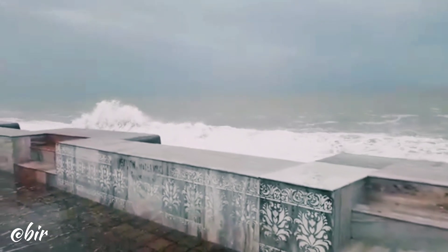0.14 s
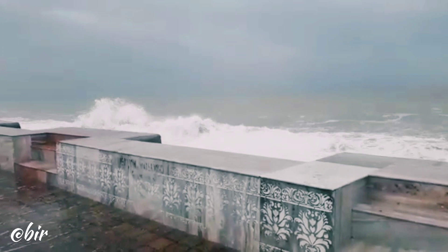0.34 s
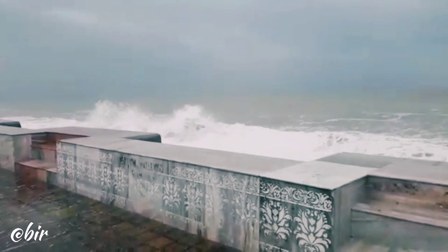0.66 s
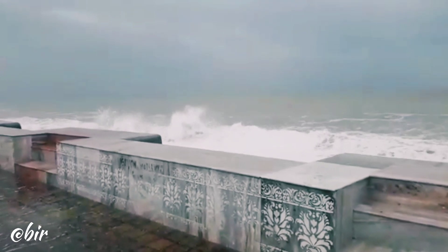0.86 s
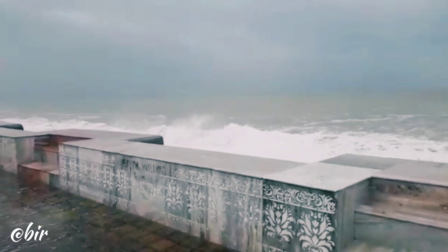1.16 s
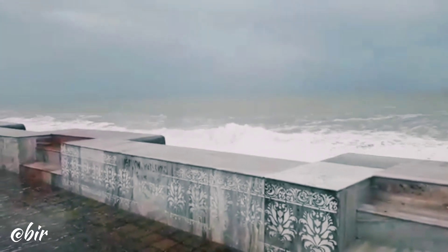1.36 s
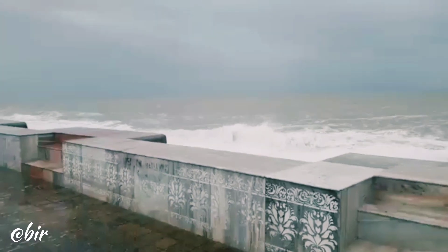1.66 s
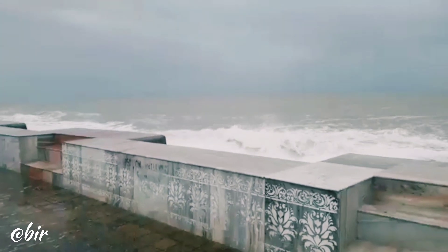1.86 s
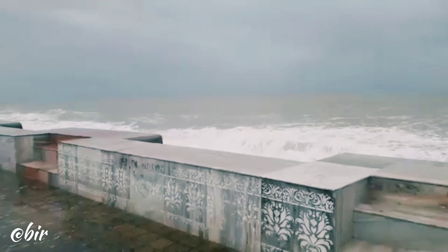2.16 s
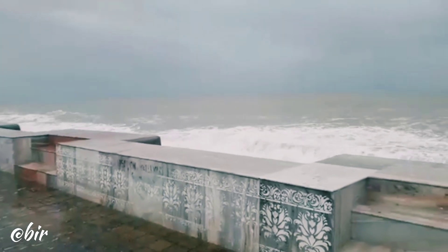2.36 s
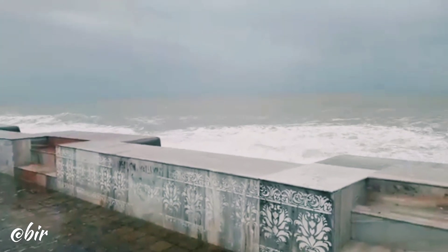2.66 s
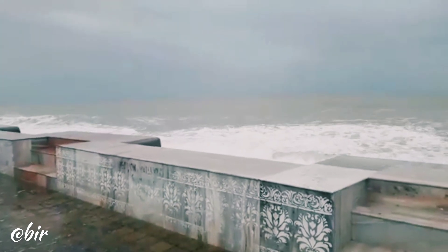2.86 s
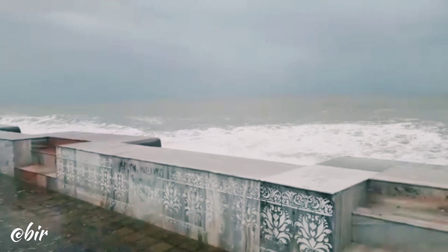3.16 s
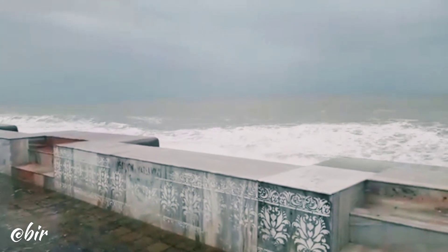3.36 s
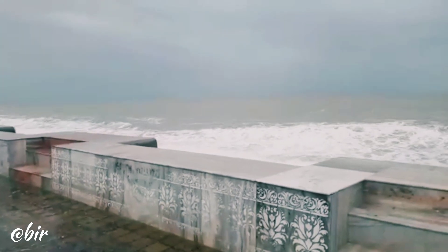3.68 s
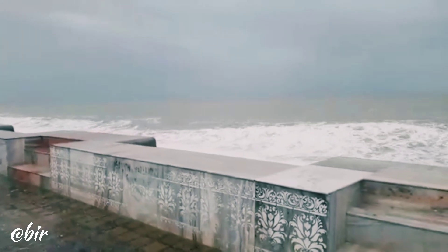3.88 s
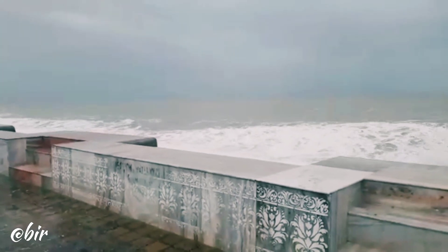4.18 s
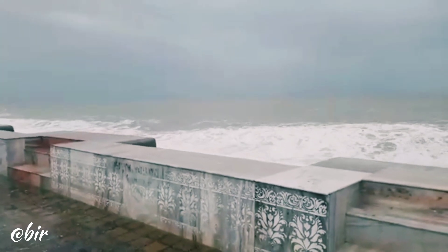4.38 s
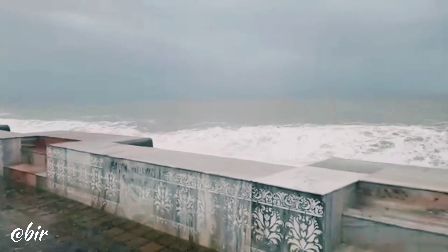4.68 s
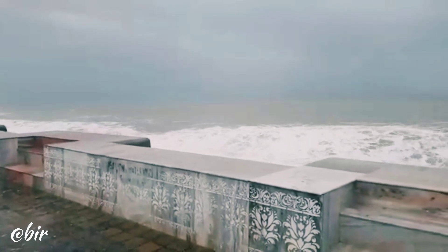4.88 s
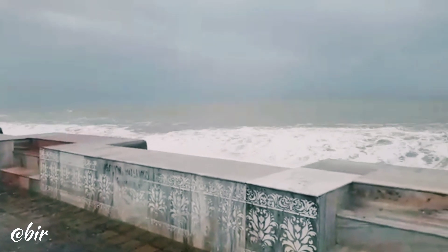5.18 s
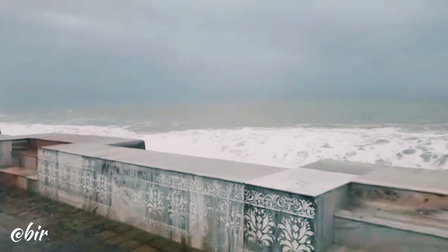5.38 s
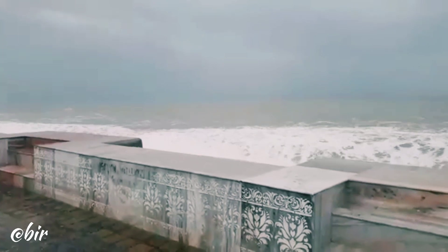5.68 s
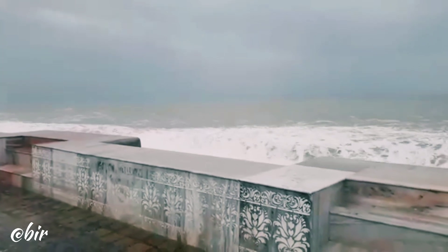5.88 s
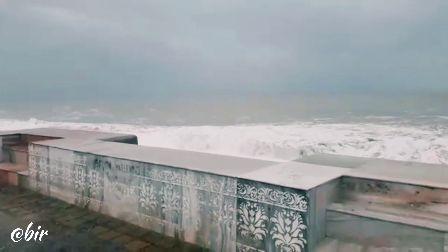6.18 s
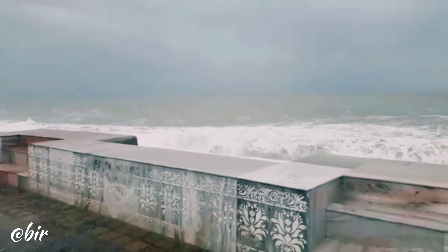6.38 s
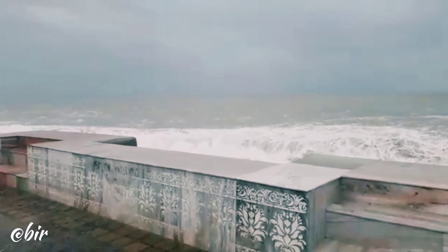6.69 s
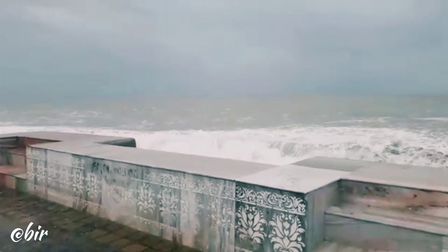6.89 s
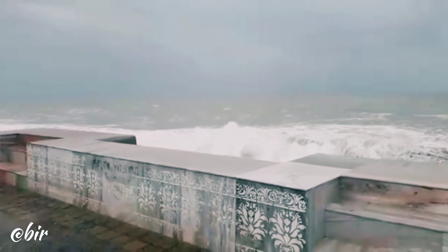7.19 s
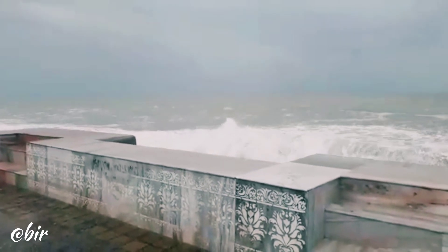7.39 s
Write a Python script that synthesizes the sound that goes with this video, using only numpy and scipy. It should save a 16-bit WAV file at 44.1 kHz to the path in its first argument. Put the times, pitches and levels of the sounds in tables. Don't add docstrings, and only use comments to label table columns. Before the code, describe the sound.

Gusty storm wind beats directly on a handheld phone microphone as short, low, muffled thumps and fluttering rumble. It starts moderate and patchy, grows into dense hard buffeting around the middle, lulls, then surges again. Far beneath, heavy surf at a seaside wall makes a steady, dull-to-foamy hiss with soft low booms. Open outdoor space, essentially mono, with slightly grainy treble.

```python
import sys
import numpy as np
from scipy import signal
from scipy.io import wavfile
from scipy.ndimage import uniform_filter1d, map_coordinates

SR = 44100
rng = np.random.default_rng(int(sys.argv[2]) if len(sys.argv) > 2 else 0)


def field_ratio(decibels):
    return 10 ** (np.asarray(decibels, dtype=float) / 20)


def persist_wave(psi):
    counts = np.round(np.clip(psi, -1, 1) * 32767).astype(np.int16)
    wavfile.write(sys.argv[1], SR, np.atleast_2d(counts).T)


N = 332514

# start_s, peak_db, pitch_hz (of the eddy), edge_db (sharp edge against the peak)
BUFFETS = [(.213, -18, 317, -15), (.335, -6.5, 213, -40), (.707, -12, 210, -18), (1.572, -7, 282, -34),
           (2.554, -8, 290, -8.5), (2.649, -7, 212, -19), (2.749, -4.5, 248, -14), (2.767, -12, 288, -18),
           (2.89, -8.5, 265, -17), (2.935, -4, 226, -15), (3.106, -8, 280, -10.5), (3.223, -2.5, 390, -25),
           (3.285, -0.5, 263, -22), (3.353, 1, 272, -11), (3.554, -6, 290, -10.5), (3.68, -5.5, 275, -31),
           (3.73, -6, 335, -22), (3.882, -6, 240, -19.5), (4.005, -10.5, 181, -29), (5.053, -6, 300, -22),
           (5.101, 2, 390, -16), (5.532, -8, 208, -19), (5.573, -8.5, 390, -18), (5.603, -5.5, 270, -32),
           (5.678, -1.5, 370, -14.5), (5.862, -8.5, 420, -8.5), (5.966, -8.5, 288, -20),
           (6.21, -9.5, 320, -18), (7.151, -6.5, 318, -29), (7.205, 0.5, 237, -35)]


def evened(x):
    return x / np.sqrt(np.mean(x ** 2) + 1e-20)


def read(points, hz, order=1):
    columns = np.transpose(points)
    return np.interp(np.log(hz + 1), np.log(columns[0] + 1), columns[order])


def lumps(per_s):
    coarse = rng.standard_normal(2000)
    return evened(map_coordinates(coarse, [np.arange(N) * per_s / SR], order=3))


def surf():
    # start_s, roar_db, bright_db (foam against the roar)
    sea = [(0, -47.5, 1.5), (.86, -47.5, 0.5), (1.2, -46, 0), (2.04, -46, -1.5), (2.55, -42.5, -3),
           (2.75, -43.5, -2), (3.3, -44, -2.5), (3.82, -46.5, -1), (4.39, -47, 0), (4.49, -44, -2.5),
           (4.6, -48, 2), (4.89, -43.5, 0), (5.08, -46.5, 0), (5.8, -47.5, 0.5), (6.1, -47.5, 1),
           (6.9, -45, -0.5), (7.25, -42.5, -0.5), (7.54, -42.5, -2)]
    # frequency_hz, density_db (per Hz)
    surf_colour = [(60, -15.5), (150, 1.5), (300, -10), (600, -16), (1000, -20.5), (1750, -25.5),
                   (2080, -23.5), (2550, -26.5), (2800, -29), (4000, -29.5), (5100, -36), (7200, -31.5),
                   (8900, -36), (13200, -44)]
    wash_share, spray_share = 0.67, 0.65
    boom_share = 1.53

    frames, hz = N // 128 + 5, np.fft.rfftfreq(512, 1 / SR)
    t = np.arange(frames) * 128 / SR
    real, imaginary, patches = rng.standard_normal((frames, 257, 3)).T
    noise = real + 1j * imaginary
    patches = uniform_filter1d(patches, size=9, axis=0)
    patches = evened(uniform_filter1d(patches, size=24, axis=1))
    flicker = evened(uniform_filter1d(rng.standard_normal(frames), size=18))

    spray = np.clip(np.log2(hz / 3600 + 1e-3) / 0.71, 0, 1)[:, None]
    wash = np.clip(np.log2(hz / 1600 + 1e-3) / 0.55, 0, 1)[:, None] * (1 - spray)
    boom = np.clip(np.log2(1200 / (hz + 1)) / 0.8, 0, 1)[:, None]

    s, roar_db, bright_db = np.transpose(sea)
    brightening_db = np.interp(t, s, bright_db - np.mean(bright_db))
    colour_db = read(surf_colour, hz)[:, None]
    field_db = colour_db + np.interp(t, s, roar_db)
    field_db = field_db + (wash_share * wash + spray_share * spray - boom_share * boom) * brightening_db
    field_db = field_db + (0.66 + 0.14 * spray) * patches
    field_db = field_db + (0.4 * wash + 0.5 * spray) * flicker

    roar_band = ((hz > 1000) & (hz < 1900))[:, None]
    plain = signal.istft(noise * field_ratio(colour_db) * roar_band, nperseg=512, noverlap=384)[1]
    water = signal.istft(noise * field_ratio(field_db), nperseg=512, noverlap=384)[1][:N]
    return water / np.std(plain)


def gusts():
    # start_s, level_db
    breeze = [(0.0, -41), (0.52, -28), (0.8, -32), (1.07, -37.5), (1.57, -31), (2.29, -33), (2.6, -25.5),
              (3.0, -26.5), (3.34, -21.5), (3.61, -22.5), (3.8, -28.5), (4.26, -38), (5.02, -22),
              (5.5, -21.5), (5.98, -26), (6.53, -29), (7.22, -22.5), (7.54, -21)]
    # centre_s, half_length_s, level_db, sharpness_db (small eddies against large)
    flurries = [(0.023, 0.15, -24, -39), (0.214, .015, -25.5, -0.5), (0.286, 0.061, -23.5, -14),
                (0.445, 0.024, -21, -6.5), (.6, 0.043, -21.5, -22), (1.437, 0.037, -19.5, -8.5),
                (1.55, .045, -20.5, -11), (1.864, 0.034, -21, -12), (2.562, .025, -17, -2.5),
                (2.762, 0.034, -11, -4.5), (2.875, 0.037, -17.5, -8), (3.01, 0.022, -26, 6.5),
                (3.108, 0.016, -9, -3), (3.184, 0.042, -12, -6), (3.288, 0.0098, -12, -0.5),
                (3.362, 0.022, -22.5, 10), (3.56, 0.023, -15, -5), (3.66, 0.033, -12.5, -7),
                (3.758, 0.018, -16.5, -3.5), (4.413, .035, -25, -4), (4.615, .025, -15, -9),
                (4.864, 0.15, -22.5, -7.5), (5.07, 0.034, -19.5, 4.5), (5.178, 0.043, -19.5, -5.5),
                (5.33, 0.023, -18, -8), (5.43, 0.056, -20, -5.5), (5.678, 0.057, -21.5, -4),
                (5.858, 0.03, -21.5, 6), (6.336, 0.018, -20, -28), (7.215, 0.069, -19, -5)]
    # centre_s, half_length_s, depth_db
    lulls = [(.92, .05, 7), (1.363, .025, 7), (2.7, .02, 6), (3.07, .025, 7), (3.61, 0.023, 11),
             (3.83, .035, 6), (3.917, .03, 7), (4.663, 0.022, 12), (5.772, 0.027, 5), (6.06, .02, 7),
             (6.151, 0.017, 6)]
    flutter_db, flutter_per_s = 5, 24
    dull_db = -13

    t = np.arange(N) / SR
    steady_db = np.interp(t, *np.transpose(breeze)) + 1.5
    steady_db = steady_db - flutter_db * np.maximum(lumps(flutter_per_s), 0)
    large = field_ratio(2 * steady_db)
    small = large * field_ratio(2 * dull_db)
    for s, half, db, sharp_db in flurries:
        bell = field_ratio(2 * db) * np.exp(-(2 * (t - s) / half) ** 2 / 2)
        large = large + bell
        small = small + bell * field_ratio(2 * sharp_db)
    lull_db = sum(db * np.exp(-((t - s) / half) ** 2) for s, half, db in lulls)
    return 10 * np.log10(large) - lull_db, 10 * np.log10(small) - lull_db


def eddies(s, size, hz, phase, cycles):
    lag = np.arange(-500, 500)
    turns = hz[:, None] * lag / SR
    bell = np.exp(-(2 * turns / cycles) ** 2)
    swing = size[:, None] * bell * np.cos(2 * np.pi * (turns + phase[:, None]))
    at = np.round(s * SR).astype(int)[:, None] + lag + 500
    return np.bincount(at.ravel(), swing.ravel(), N + SR)[500:N + 500]


def tumble(level_db, hz, spread, cycles, uneven_db, lumpy_db, count):
    when, big, pitch, phase = rng.random((count, 4)).T
    size = field_ratio(-uneven_db * np.log(1 - 0.98 * big))
    eddy_hz = hz * np.exp(spread * (2 * pitch - 1))
    stream = evened(eddies(when * N / SR, size, eddy_hz, phase, cycles))
    clumped = evened(stream * field_ratio(lumpy_db * lumps(per_s=33)))
    return field_ratio(level_db) * clumped


def wind(large_db, small_db):
    large = tumble(large_db - 2.0, hz=131.3, spread=0.72, cycles=1.46, uneven_db=2.0, lumpy_db=1.3, count=1800)
    small = tumble(small_db - 2.0, hz=390, spread=0.42, cycles=1.51, uneven_db=1.0, lumpy_db=1.53, count=3000)
    return large + small


def puffs():
    # start_s, peak_db, pitch_hz (of the eddy)
    puff_rows = [(.024, -19, 192), (.305, -6.5, 187), (.428, -13, 228), (.481, -11, 201), (.579, -14, 250),
                 (.8, -16.5, 212), (1.223, -12.5, 180), (1.484, -9, 168), (1.547, -10, 200),
                 (1.867, -14, 280), (2.056, -14, 198), (2.861, -7.5, 158), (3.179, -1, 310),
                 (3.197, -20, 260), (3.405, -7, 253), (3.484, -8, 273), (3.762, -4.5, 228),
                 (4.12, -13.5, 227), (4.43, -10, 250), (4.71, -12.5, 193), (4.762, -9.5, 252),
                 (4.849, -9.5, 200), (5.227, -8, 218), (5.448, -9, 218), (5.482, -9.5, 197),
                 (5.822, -3.5, 296), (6.653, -11, 173), (6.998, -13.5, 177), (7.265, -5, 211),
                 (7.336, -10, 214)]
    s, peak_db, hz = np.transpose(puff_rows)
    return eddies(s, field_ratio(peak_db - 2.5), hz, rng.random(len(s)), cycles=1.08)


def knocks(wind_db, count):
    knock_db, spread_db, knock_hz, edge_db = 10, 9, 232, -29
    late, big, pitch, edge = rng.random((count, 4)).T
    s = (np.arange(count) + late) * (N - 1) / SR / count
    peak_db = wind_db[(s * SR).astype(int)] + knock_db - spread_db * big
    hz = knock_hz * np.exp(0.5 * (pitch - 0.5))
    return np.transpose([s, peak_db, hz, edge_db + 12 * (edge - 0.5)])


def buffets(rows):
    s, peak_db, hz, edge_db = np.transpose(rows)
    phase, edge_phase, late = rng.random((len(s), 3)).T
    body = eddies(s, field_ratio(peak_db), 1.015 * hz, phase, cycles=0.81)
    edge_s = s + 0.002 * (late - 0.5)
    edge = eddies(edge_s, field_ratio(peak_db + edge_db + 2), 330 + 1.34 * hz, edge_phase, cycles=2.4)
    return body + edge


def wakes(wind_db):
    delay_s, wake_db, pitch_ratio = 0.00924, 7.5, 0.88
    s, peak_db, hz, _ = np.transpose(BUFFETS)
    size = field_ratio(np.minimum(wind_db[(s * SR).astype(int)] + wake_db, peak_db))
    return eddies(s + delay_s, size, pitch_ratio * hz, rng.random(len(s)), cycles=1.68)


def port(air):
    # frequency_hz, gain_db
    port_colour = [(20, -67), (45, -14), (80, -5), (130, 0), (500, -3), (900, -3), (1500, -9.5),
                   (3000, -20.5)]
    ceiling = 0.88
    log_gain = np.log(field_ratio(read(port_colour, abs(np.fft.fftfreq(16384, 1 / SR)))))
    taps = np.fft.ifft(np.exp(np.conj(signal.hilbert(log_gain)))).real[:4096]
    coloured = signal.oaconvolve(air, taps)[:N]
    return ceiling * np.tanh(coloured / ceiling)


def scene():
    sea = surf()
    large_db, small_db = gusts()
    air = wind(large_db, small_db) + puffs()
    air = air + buffets(BUFFETS) + buffets(knocks(large_db, count=130)) + wakes(large_db)
    low_cut = signal.butter(2, 55, "high", fs=SR, output="sos")
    heard = signal.sosfilt(low_cut, port(air) + sea)
    return np.tile(heard, (2, 1))


def runs(chance, size):
    return np.argsort(np.argsort(uniform_filter1d(chance, size=size))) / len(chance)


def patchy_treble(mono):
    # frequency_hz, apart_share (frames with noise apart in each ear, 0-1), dropped_share (0-1)
    filled_bands = [(4000, 0, 0), (4300, .45, 0), (5700, .78, 0), (7900, .94, .005), (8500, .13, .04),
                    (12000, .04, .05), (12450, .85, .4), (12750, .85, .4), (12800, 0, .4)]
    apart_db, top_shelf_db, jitter_db = -3, -2.5, 2.0

    lead, n, k = 860, np.arange(2048), np.arange(1024)
    window = signal.windows.kaiser_bessel_derived(2048, 4 * np.pi)
    basis = window * np.cos(np.pi / 1024 * (k[:, None] + 0.5) * (n + 512.5)) / np.sqrt(512)
    at = 1024 * np.arange(N // 1024 + 2) + n[:, None]
    z = basis @ np.r_[np.zeros(lead), mono, np.zeros(4096)][at]
    frames = z.shape[1]
    hz, band = k[:, None] * SR / 2048, k // 32
    centre_hz = (band + 0.5) * SR / 64
    top = hz > 12400

    fill, drop = rng.random((frames, 32, 2)).T[:, band]
    together = 0.8 * runs(fill[0], size=3) + 0.2 * fill
    fill = np.where(hz < 8270, together, fill)
    drop = np.where(top, runs(drop[0], size=2), drop)
    drop = drop < read(filled_bands, centre_hz, order=2)[:, None]
    filled = fill < read(filled_bands, np.where(top, hz, centre_hz[:, None]))
    filled = filled | (drop & ~top)

    power = uniform_filter1d(uniform_filter1d(z ** 2, size=32, axis=0), size=3, axis=1)
    mid = z * ~drop * (hz < 13090)
    side = field_ratio(apart_db) * filled * np.sqrt(power) * rng.standard_normal((frames, 1024)).T

    gain_db = jitter_db * rng.standard_normal((frames, 32)).T[band] * (hz > 4100)
    gain = field_ratio(gain_db + top_shelf_db * (hz > 8960))
    ears = []
    for ear in (mid + side, mid - side):
        pieces = basis.T @ (gain * ear)
        ears.append(np.bincount(at.ravel(), pieces.ravel())[lead:lead + N])
    return np.array(ears)


def low_pass(x):
    return signal.sosfilt(signal.butter(12, 13340, fs=SR, output="sos"), x)


def record(dry):
    ears = patchy_treble(dry[0])
    return low_pass(ears)


dry = scene()
out = record(dry)
persist_wave(out)
```